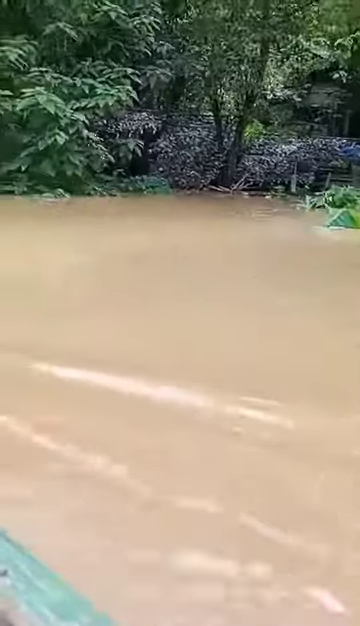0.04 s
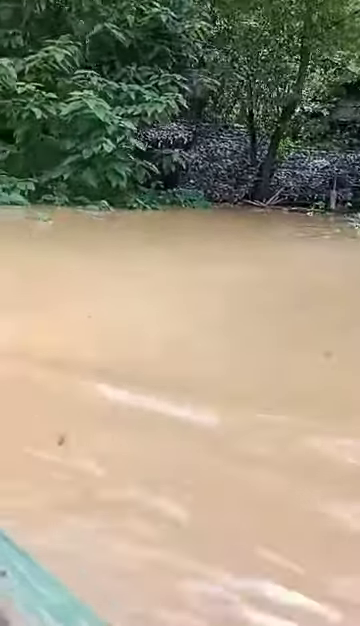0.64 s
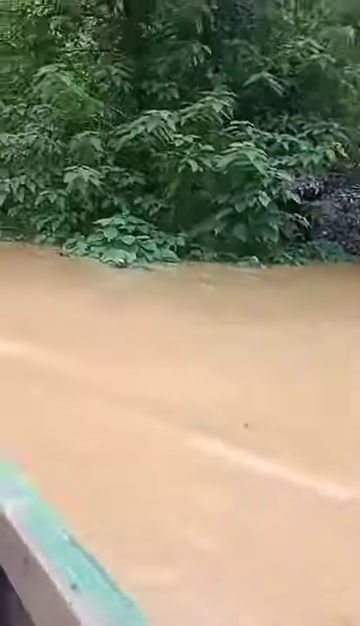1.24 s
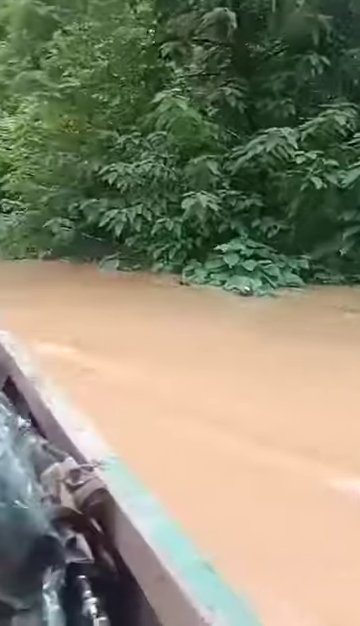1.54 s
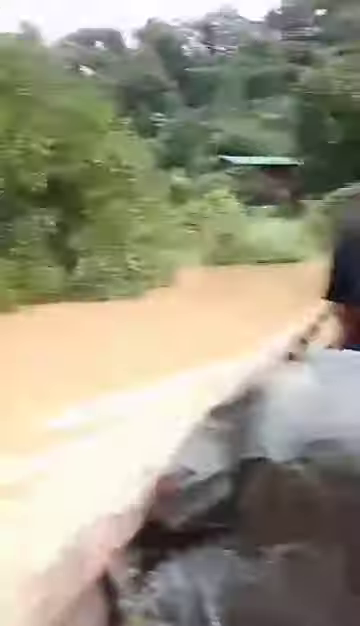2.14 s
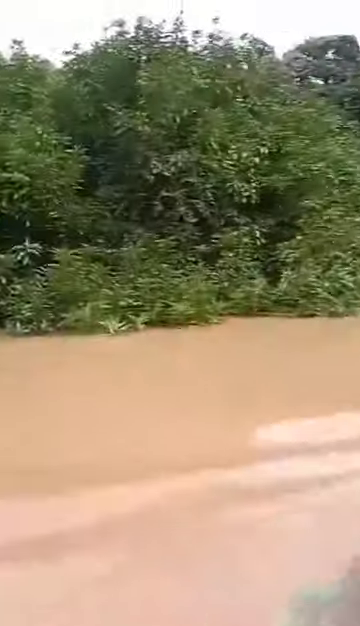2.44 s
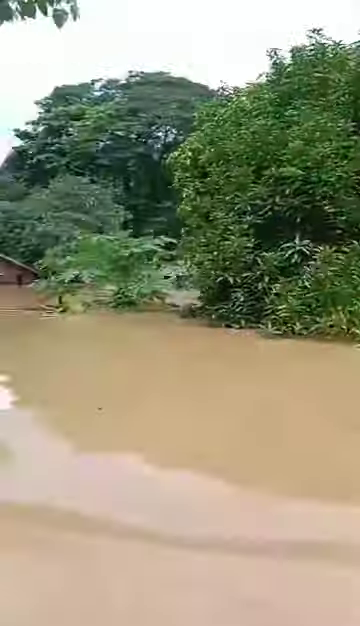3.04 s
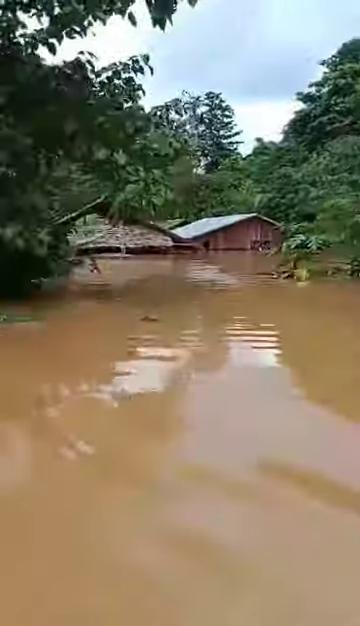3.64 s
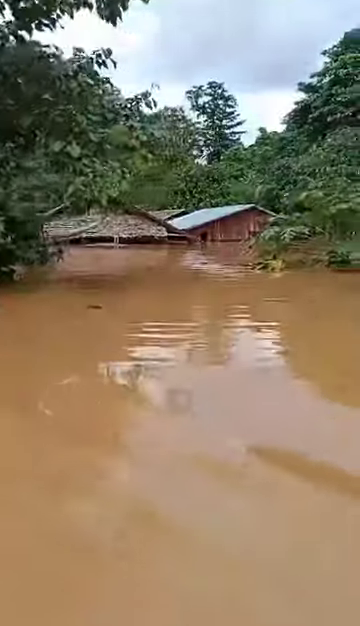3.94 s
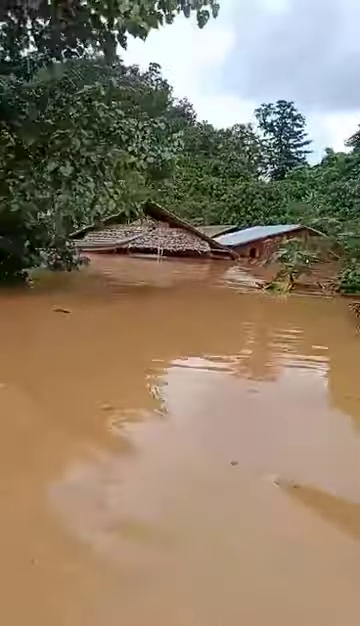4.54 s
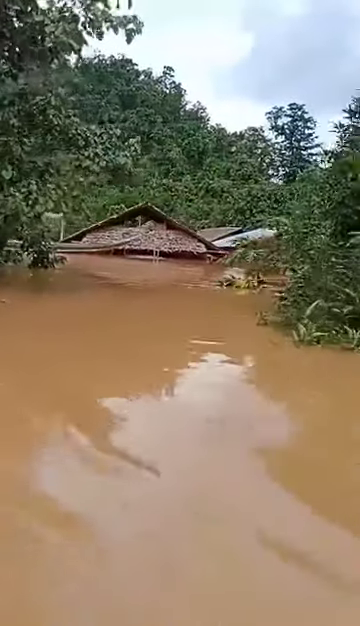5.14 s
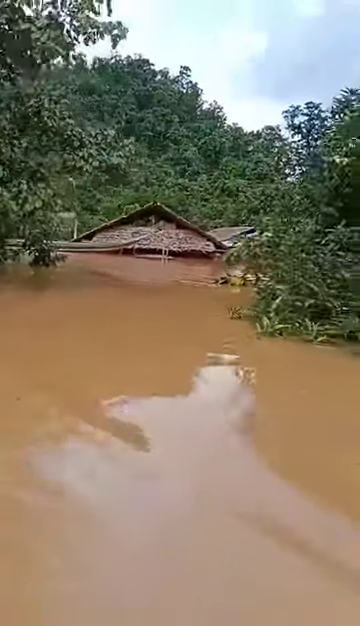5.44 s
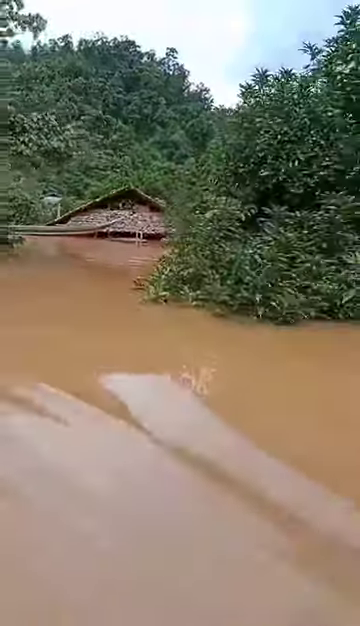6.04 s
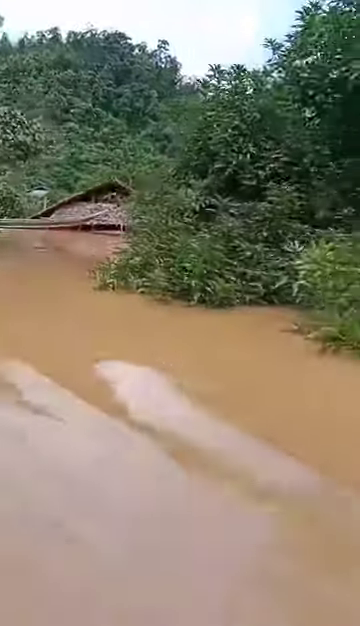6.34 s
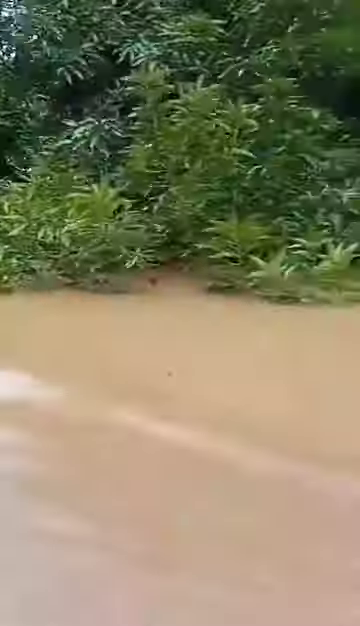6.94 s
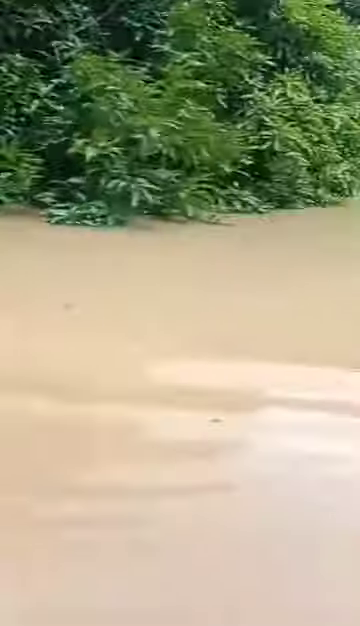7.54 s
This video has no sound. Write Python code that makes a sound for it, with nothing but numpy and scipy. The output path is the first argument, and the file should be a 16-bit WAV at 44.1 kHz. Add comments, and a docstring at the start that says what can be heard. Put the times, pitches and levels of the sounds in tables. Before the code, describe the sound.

Fast, even thumping of a longboat's single-cylinder engine on a river, with rattling metal, hissing water and occasional wind bumps.

```python
"""On board a longboat, a single-cylinder diesel putters along a river, about eight firings a second.
From the start, each firing thumps through the exhaust, knocks the block and sets loose metal clattering,
over a droning hull, a watery hiss and a head wind. Small splashes and two sharp engine taps come in the
first second and a half. After two seconds, gusts begin to bump the microphone; then the planks grow
louder and the clatter eases. Now and then a firing catches harder, the hardest just before the end."""
import sys
import numpy as np
from scipy import signal
from scipy.fft import rfft, irfft, next_fast_len
from scipy.io import wavfile
from scipy.ndimage import map_coordinates

SR = 44100
rng = np.random.default_rng(int(sys.argv[2]) if len(sys.argv) > 2 else 0)


def to_wav(sig):
    """Store sig (one row per channel, or 1-D mono) as 16-bit WAV at the path in sys.argv[1].

    Samples outside -1..1 are clipped; the rate is SR.
    """
    pcm = np.clip(np.atleast_2d(sig), -1, 1) * 32767
    pcm = np.round(pcm).astype(np.int16)
    wavfile.write(sys.argv[1], SR, pcm.T)  # frames by channels


N = 342657
TIME = np.arange(N) / SR
STROKE = np.arange(-SR // 20, SR // 4) / SR  # seconds from a firing


def amp(db):
    """Turn decibels into a gain."""
    return 10 ** (np.asarray(db) / 20)


def unit(x):
    """Scale to an average strength (rms) of 1."""
    return x / np.sqrt(np.mean(x ** 2) + 1e-20)


def wobble(rate):
    """A smooth curve through random points, rate of them a second."""
    return map_coordinates(rng.standard_normal(int(N * rate / SR) + 4), [TIME * rate])


def filtered(x, response):
    """Change each frequency in x by the given response."""
    size = next_fast_len(N + SR // 2)
    return irfft(rfft(x, size) * response(np.fft.rfftfreq(size, 1 / SR)), size)[:N]


def coloured(x, spectrum):
    """Give x the tone colour of a table of f/Hz, level/dB, at rms 1."""
    hz, db = np.transpose(spectrum)
    return unit(filtered(x, lambda f: amp(np.interp(np.log(f + 1), np.log(hz), db))))


def resonate(x, modes):
    """Let x ring a body's natural tones; neighbouring tones swing in opposite directions."""
    return filtered(x, lambda f: sum(
        (-1) ** k * amp(db) * 1j * f * width / (hz * hz - f * f + 1j * f * width)
        for k, (hz, width, db) in enumerate(modes)))


def ring(force, modes, soft_hz):
    """Ring a body through soft contacts that dull the treble, keeping the force's rms."""
    softened = filtered(force, lambda f: 1 / (1 + (f / soft_hz) ** 4))
    return force.std() * unit(resonate(softened, modes))


def grains(rate, spread_db):
    """Noise like tiny contacts of uneven size, at rms 1."""
    return unit(rng.standard_normal(N) * amp(spread_db * wobble(rate)))


def burst(t, attack, t60):
    """A loudness curve that rises at t = 0, then fades by 60 dB every t60 seconds."""
    t = np.maximum(t, 0)
    return (1 - np.exp(-t / attack)) * amp(-60 * t / t60)


def add(track, s, sound):
    """Mix a sound into the track at s seconds."""
    start = round(s * SR)
    part = sound[max(-start, 0):max(N - start, 0)]
    track[max(start, 0):][:len(part)] += part


def blows(times, levels_db):
    """One clean, sharp push at each time."""
    force = np.zeros(N)
    for s, db in zip(times, levels_db):
        add(force, s, amp([db]))
    return force


def strokes(times, levels_db, shape, alike, density=1500):
    """A flurry of tiny contacts per firing, density a second; alike is the share that repeats."""
    chance = density / SR

    def touches():
        return rng.choice([-1, 1], len(STROKE)) * (rng.random(len(STROKE)) < chance) / np.sqrt(chance)

    pattern = touches()  # the same parts touch in the same order in every cycle
    force = np.zeros(N)
    for s, db in zip(times, levels_db):
        contacts = np.sqrt(alike) * pattern + np.sqrt(1 - alike) * touches()
        add(force, s + STROKE[0], amp(db) * shape * contacts)
    return force


# how far the tone colour shifts from moment to moment: f/Hz, swing/dB
COLOUR_SWING = [(800, -17.5), (2000, 14.5), (2800, 10), (5800, 9), (7000, 2.5), (10000, 6.5), (13000, 13)]

def patches(hz, count, width_hz, peak=2.36):
    """Make count random tone colours: gains over hz, with rounded peaks about width_hz wide."""
    knots = rng.standard_normal((count, 400))
    grid = np.meshgrid(np.arange(count), hz / width_hz, indexing="ij")
    hills = map_coordinates(knots, grid, mode="mirror")
    gain = amp(peak * np.tanh(hills / peak) * np.interp(hz, *np.transpose(COLOUR_SWING)))
    return gain / np.sqrt(np.mean(gain ** 2, axis=1, keepdims=True))


# gusts on the microphone: t/s, level/dB, half length/s
GUSTS = [(2.255, -31, 0.024), (3.445, -38, 0.036), (3.866, -32, 0.038), (4.062, -20.5, 0.011),
         (4.905, -26, 0.023), (4.94, -31, 0.029), (5.61, -31, 0.013), (6.476, -30.5, 0.023)]
# tone colour of the wind: f/Hz, level/dB
WIND_COLOUR = [(20, 4), (45, -7), (70, -13.5), (120, 2), (170, 3), (230, -14), (300, -11), (500, -32),
               (1200, -62)]

def wind(breeze_db=-38.7):
    """The head wind rumbles softly and now and then bumps the microphone."""
    bumps = sum(amp(db) * np.exp(-.5 * ((TIME - s) / half) ** 2) for s, db, half in GUSTS)
    breeze = amp(breeze_db + 1.8 * wobble(7))
    return (breeze + bumps) * coloured(rng.standard_normal(N), WIND_COLOUR)


# tone colour of the watery hiss: f/Hz, level/dB
HISS_COLOUR = [(700, -20), (1500, 2.5), (2150, 1), (2400, -6), (3050, -6), (3600, 3), (4200, 1.5),
               (4900, -11), (5500, -1.5), (6100, -8), (6900, 1.5), (8700, -1.5), (9600, -12.5), (10700, -9),
               (11600, -45)]

def watery_hiss():
    """A steady watery hiss, with a faint random warble in its tone colour."""
    hiss = coloured(grains(rate=420, spread_db=0), HISS_COLOUR)
    hz, t, slices = signal.stft(hiss, SR, nperseg=512)
    colours = patches(hz, count=120, width_hz=322.3)
    grid = np.meshgrid(np.linspace(0, len(colours) - 1, len(t)), np.arange(len(hz)))
    drift = map_coordinates(np.log(colours), grid, order=1)  # glide from one colour to the next
    warbled = signal.istft(slices * np.exp(0.92 * drift), nperseg=512)[1][:N]
    return amp(-3 + 0.32 * wobble(15)) * unit(warbled)


# short bright ticks and spatters: t/s, level/dB, fade time/s
SPATTERS = [(0.489, -39, 0.096), (1.039, -41.5, 0.07), (1.149, -43.5, 0.35), (1.237, -37, 0.034),
            (1.253, -41, .12), (1.263, -39, 0.044), (1.271, -35, 0.044), (1.284, -44, 0.061),
            (1.372, -35, 0.045)]
# their tone colour: f/Hz, level/dB
SPATTER_COLOUR = [(600, 1), (2000, 4), (4000, 0), (8000, 2.5), (11000, -15.5), (15500, -16)]

def ticks_and_spatters():
    """Two sharp engine taps (the second and third rows) sound among small splashes."""
    level = sum(amp(db) * burst(TIME - s, 0.0016, t60) for s, db, t60 in SPATTERS)
    return level * coloured(grains(rate=860, spread_db=2), SPATTER_COLOUR)


# engine speed, wandering a little around its setting: t/s, firing rate/Hz
ENGINE_SPEED = [(0.0, 7.708), (0.23, 8.03), (1.78, 7.694), (2.26, 8.012), (2.43, 7.689), (2.95, 7.895),
                (3.84, 7.861), (4.01, 8.069), (4.17, 7.827), (5.64, 7.887), (5.97, 7.666), (6.13, 7.906),
                (6.84, 7.831), (7.17, 8.053), (7.32, 7.771), (7.77, 7.694)]

def firing_times(first_s=0.0457):
    """The cylinder fires each time the engine completes a cycle."""
    cycles = np.cumsum(np.interp(TIME, *np.transpose(ENGINE_SPEED))) / SR
    cycles -= np.interp(first_s, TIME, cycles)
    return np.interp(np.arange(int(cycles[-1]) + 1), cycles, TIME)


# firings that catch harder than the rest and jolt the metal: t/s, extra level/dB
HARD_FIRINGS = [(1.31, 3), (2.334, 4), (3.609, 6), (4.114, 6.5), (4.496, 3.5), (4.625, 4.5), (6.663, 2.5),
                (7.295, 6), (7.553, 9)]

def firing_levels(times, gear_db):
    """Each firing's strength depends on how hard it catches, where the microphone points, and chance."""
    extra_db = np.zeros(len(times))
    for s, db in HARD_FIRINGS:
        extra_db[np.argmin(abs(times - s))] = db
    # valve and block partly follow the gear case's level, as all sit on the engine
    facing_db = np.interp(times, TIME, gear_db - gear_db.mean())
    chance = rng.standard_normal((4, len(times)))
    thump_db = 0.5 + 0.13 * extra_db + 0.64 * chance[0]
    tap_db = -43.5 + 0.5 * facing_db + 2.5 * chance[1]
    knock_db = -43.5 + 0.17 * facing_db + 0.56 * extra_db + 1.5 * chance[2]
    jolt_db = extra_db + 0.97 * chance[3]
    return thump_db, tap_db, knock_db, jolt_db


def chug(times, depth_db=1, lag_cycles=0.077):
    """A gain that swells around each firing and sinks while the engine coasts between them."""
    cycles = np.interp(TIME, times, np.arange(len(times)))
    return amp(depth_db * np.cos(2 * np.pi * (cycles - lag_cycles)))


# ringing tones of the hull's ribs: f/Hz, width/Hz, level/dB
RIB_TONES = [(277.5, 19, 1.5), (326, 34, -1.5), (407, 76, -5.5), (452, 70, -7.5)]
# ringing tones of the hull's planks: f/Hz, width/Hz, level/dB
PLANK_TONES = [(390, 34, -5.5), (481.7, 44, 1), (541, 13, -0.5), (596.6, 49, -2.5), (689, 26, -4.5),
               (777, 76, -10), (894, 18, -10.5)]

def hull(times, levels_db, ribs_db, planks_gain):
    """The engine mounts shake the ribs; the planks stir, bark with the firing and rebound."""
    rib_shape = (amp(-43.5) * burst(STROKE + 0.0012, 0.0035, 0.57)
                 + amp(-49.5) * burst(STROKE - .026, 0.0028, 0.11))
    ribs = ring(strokes(times, ribs_db, rib_shape, alike=0.48), RIB_TONES, soft_hz=613)
    stir = amp(-2) * burst(STROKE + 0.0354, 0.0023, 0.44)  # as the piston squeezes the air
    bark = amp(2.5) * burst(STROKE + 0.0055, 0.00048, 0.11)
    rebound = amp(-5.5) * burst(STROKE - .029, 0.0031, 0.2)
    force = strokes(times, levels_db, stir + bark + rebound, alike=0.23, density=800)
    force += blows(times + 0.00096, levels_db + 25) + blows(times + .031, levels_db + 23)
    planks = ring(planks_gain * force, PLANK_TONES, soft_hz=1500)
    # the steady drone only comes through where the planks are loudest
    tremble = planks_gain ** 2 / planks_gain.max() * chug(times) * grains(rate=110, spread_db=1.5)
    drone = ring(tremble, PLANK_TONES, soft_hz=1220)
    return ribs + amp(1) * planks + amp(-5) * drone


# ringing tones of a loose metal part on the planks: f/Hz, width/Hz, level/dB
CLINK_TONES = [(2195, 59, 0), (2620, 54, -11)]

def loose_part(times, planks_gain, rebound_s=0.028):
    """A loose part clinks twice a cycle: as the planks are jolted and as they rebound."""
    jolt_db, rebound_db = 13 + 5.5 * rng.standard_normal((len(times), 2)).T
    force = blows(times, jolt_db) + blows(times + rebound_s, rebound_db + 1)
    force += strokes(times, jolt_db, amp(-20) * burst(STROKE - rebound_s, 0.001, 0.07), alike=0.5)
    return ring(planks_gain ** 2 / planks_gain.max() * force, CLINK_TONES, soft_hz=4500)


# tone colour of the loose metal: f/Hz, level/dB
METAL_COLOUR = [(900, -45), (1900, -2.5), (2400, -13.5), (2600, 0.5), (3000, -7.5), (3400, 2.5), (4400, 2),
                (5800, 0.5), (6170, -1.5), (6800, 7.5), (8700, 0), (9500, -6), (11300, -13.5), (12500, -17),
                (15500, -31)]

def clatter(times, clacks_db, tails_db):
    """Each firing jolts the loose metal: a clack, a bounce and a fading rattle."""
    t = np.arange(SR // 3) / SR
    clack = amp(2.5) * burst(t, 0.0045, 0.13)
    tail = amp(1.5) * burst(t, 0.0052, 0.43) + amp(-17) * burst(t - .028, 0.011, 0.44)
    rattle = coloured(grains(rate=700, spread_db=2.5), METAL_COLOUR)
    # the parts land differently each time, so different tones stand out
    colours = patches(np.fft.rfftfreq(len(t), 1 / SR), len(times), width_hz=170)
    starts = np.linspace(0, N - len(t), len(times)).astype(int)
    track = np.zeros(N)
    for s, db, tail_db, colour, start in zip(times, clacks_db, tails_db, colours, starts):
        metal = irfft(rfft(rattle[start:start + len(t)]) * colour, len(t))
        add(track, s - .0035, (amp(db) * clack + amp(tail_db) * tail) * unit(metal))
    return track


# ringing tones of the valve cover and gear case: f/Hz, width/Hz, level/dB
COVER_TONES = [(725, 115, -5), (998.6, 44, 4.5), (1171, 53, 1.5), (1350, 440, -5.5), (1562, 78, 1.5),
               (1836, 48, -13.5), (2180, 340, -13.5)]

def valve_gear(times, levels_db, gear_gain):
    """A valve taps and chatters ahead of each firing, and the gear case keeps buzzing."""
    chatter = strokes(times, levels_db, amp(1.5) * burst(STROKE + 0.022, 0.0022, 0.16), alike=0.094)
    taps = blows(times - .023, levels_db + 18.5)
    buzz = amp(-11.5) * gear_gain * chug(times) * grains(rate=100, spread_db=3)
    return ring(taps + chatter + buzz, COVER_TONES, soft_hz=3500)


# ringing tones of the block, the engine's metal body: f/Hz, width/Hz, level/dB
BLOCK_TONES = [(972, 31, -25), (1335, 50, 5.5), (1600, 200, -6), (2070, 40, -10), (2230, 21, -8),
               (2490, 24, -14.5)]

def block(times, levels_db):
    """The block knocks as the fuel ignites, chatters, and knocks more softly as the piston tips over."""
    ignition = amp(3.5) * burst(STROKE + 0.0098, 0.0035, 0.12)
    piston_tip = amp(-7) * burst(STROKE - .026, 0.0099, 0.23)
    chatter = strokes(times, levels_db, ignition + piston_tip, alike=0.63)
    return ring(chatter + blows(times, levels_db + 17), BLOCK_TONES, soft_hz=4420)


# ringing tones of the exhaust pipe and the hollow of the hull: f/Hz, width/Hz, level/dB
EXHAUST_TONES = [(99.3, 14.5, 25), (164.97, 76.1, 50), (144.6, 58.04, 49.0), (222.45, 22.23, 45),
                 (213.8, 68.7, 45), (266.8, 21.8, 27.5)]

def exhaust(times, levels_db, soft_hz=621):
    """One soft-edged puff of gas per firing rings the pipe."""
    puffs = filtered(blows(times, levels_db), lambda f: 1 / (1 + 1j * f / soft_hz) ** 2)
    return resonate(puffs, EXHAUST_TONES)


# how strongly each part reaches the turning microphone:
# t/s, planks level/dB, gear case level/dB, loose metal level/dB, hiss level/dB
REACH = [(0, -46.5, -32, -47, -44), (0.6, -53, -31.5, -40, -48), (1.35, -50, -36, -39, -47),
         (1.7, -51.5, -43.5, -39, -47), (2.3, -48.5, -48, -43, -50), (2.85, -43, -41, -43.5, -52.5),
         (3.55, -41, -40, -51, -49.5), (5, -39.5, -38.5, -55, -48), (6.9, -40.5, -40.5, -52.5, -47.5),
         (7.35, -45, -41.5, -52.5, -49.5), (7.77, -48, -47, -51, -52.5)]

def scene():
    """Engine, boat, water and wind meet at one microphone."""
    s, *columns = np.transpose(REACH)
    planks_db, gear_db, metal_db, hiss_db = [np.interp(TIME, s, db) for db in columns]
    times = firing_times()
    thump_db, tap_db, knock_db, jolt_db = firing_levels(times, gear_db)
    clack_db = np.interp(times, TIME, metal_db)
    near_db = clack_db - clack_db.mean()
    rattle_db = -48 + 0.25 * near_db
    ribs_db = thump_db + 0.3 * near_db  # the ribs are nearest when the loose metal is
    engine = exhaust(times, thump_db) + block(times, knock_db) + valve_gear(times, tap_db, amp(gear_db))
    metal = clatter(times, clack_db + jolt_db, rattle_db + jolt_db) + loose_part(times, amp(planks_db))
    boat = hull(times, thump_db, ribs_db, amp(planks_db))
    return (engine + metal + boat + amp(hiss_db) * watery_hiss() + ticks_and_spatters() + wind())[None]


def record(dry, low_hz=56, top_hz=15700):
    """The microphone thins the deep bass and keeps nothing above top_hz."""
    bass = lambda f: .15 + .85 * f ** 8 / (f ** 8 + low_hz ** 8)
    return filtered(dry[0], lambda f: bass(f) * (f < top_hz))[None]


dry = scene()
out = record(dry)
to_wav(out)
```